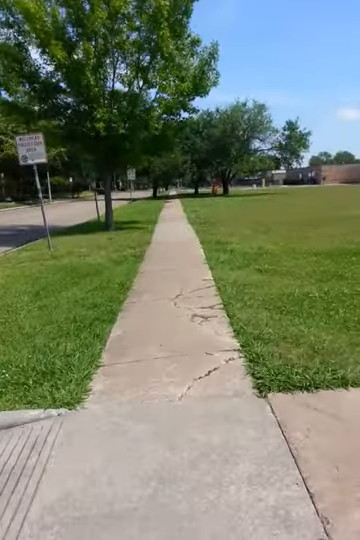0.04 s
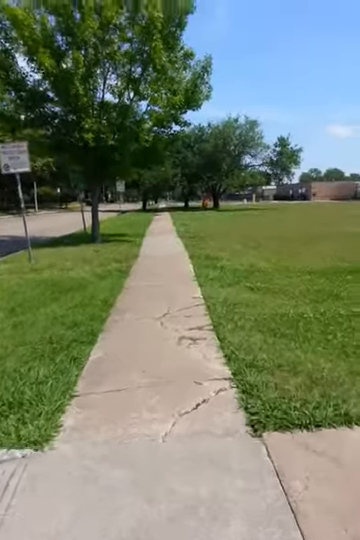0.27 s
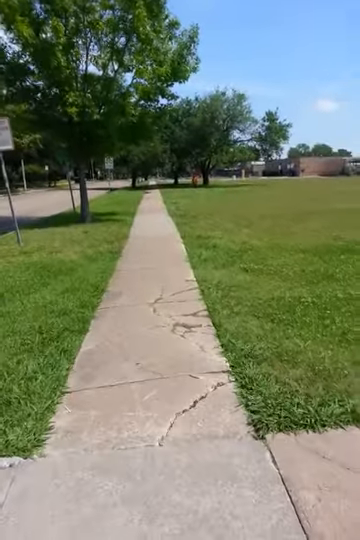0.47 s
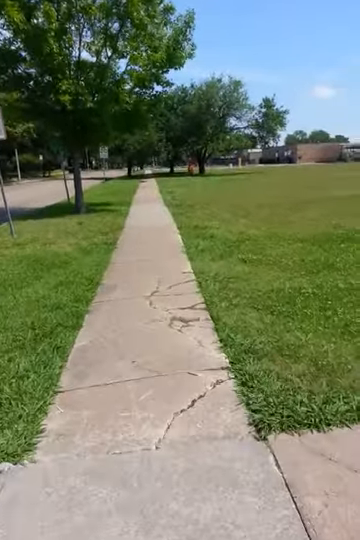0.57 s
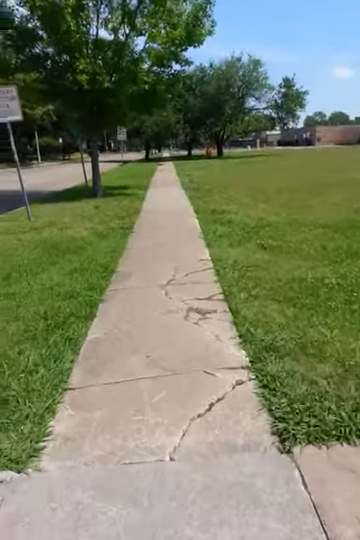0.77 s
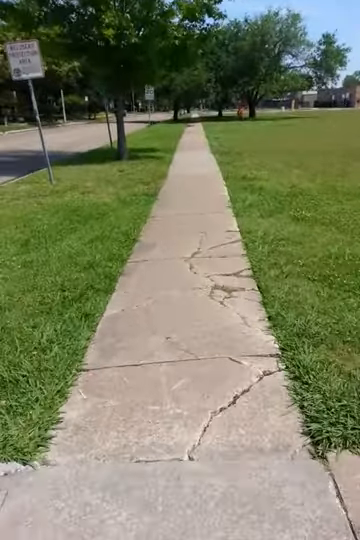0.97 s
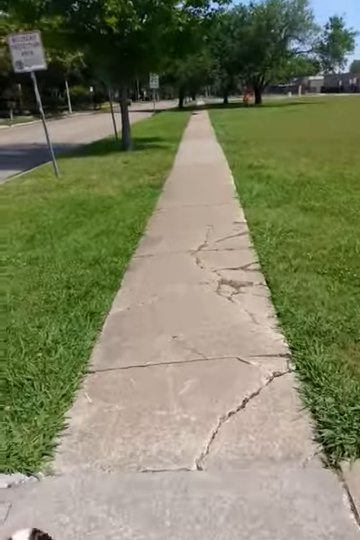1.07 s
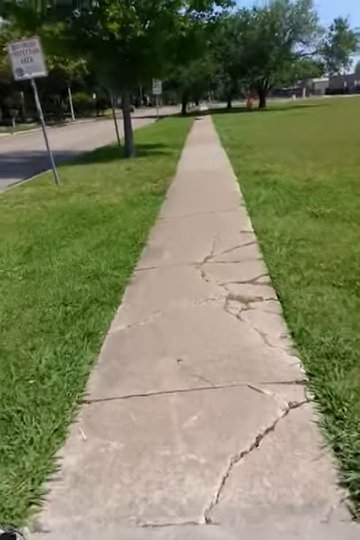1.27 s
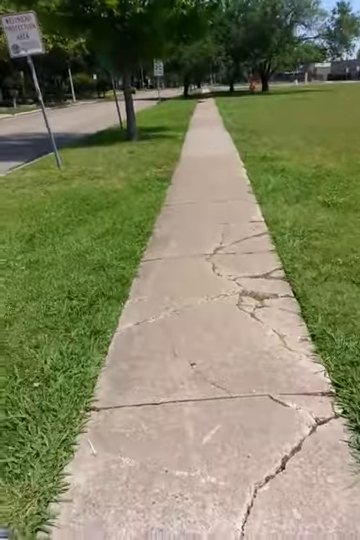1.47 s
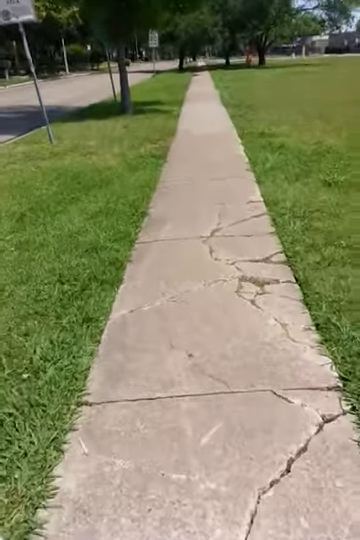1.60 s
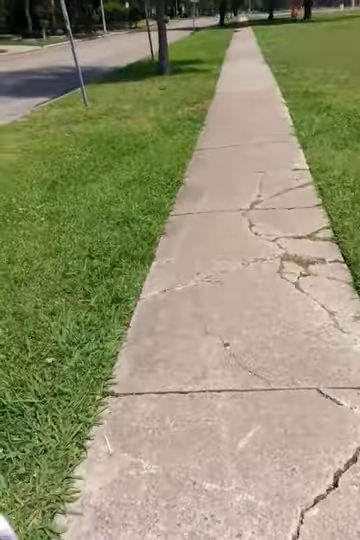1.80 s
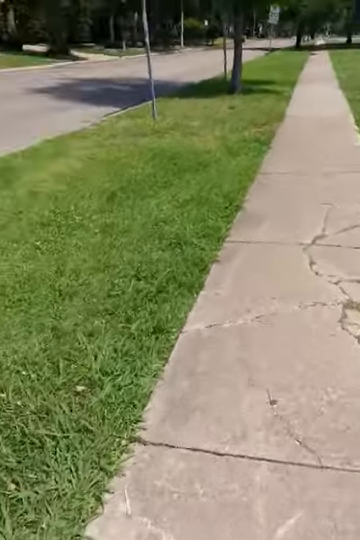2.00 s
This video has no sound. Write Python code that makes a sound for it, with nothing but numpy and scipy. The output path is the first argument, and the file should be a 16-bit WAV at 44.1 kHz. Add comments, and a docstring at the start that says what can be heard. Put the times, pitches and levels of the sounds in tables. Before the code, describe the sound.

Footsteps scuff and crunch on a gritty concrete sidewalk, with a heavy dull wind thump midway

```python
"""A concrete sidewalk, walked with a phone in hand. Soles and clothing rub (dense random slips under
rounded strokes), grit crunches (short bright clusters of cracks) and shoes knock softly (damped noise).
Air buffets the left microphone port twice, the second time as a heavy dull thump (fluttering noise).
A small bird sings a buzzy phrase in the trees (frequency-modulated glides with faint echoes);
light wind and far traffic lie underneath (coloured noise)."""
import sys
import numpy as np
from scipy import signal
from scipy.fft import rfft, irfft
from scipy.io import wavfile
from scipy.ndimage import uniform_filter1d

SR = 44100
rng = np.random.default_rng(int(sys.argv[2]) if len(sys.argv) > 2 else 0)


def transcribe(signal):
    """Save signal, clipped to [-1, 1], as a 16-bit WAV file at the path in sys.argv[1]."""
    frames = np.atleast_2d(signal).T
    limited = np.clip(frames, -1, 1)
    pcm = np.round(limited * 32767).astype(np.int16)
    wavfile.write(sys.argv[1], SR, pcm)


N = 90360
TIME_S = np.arange(N) / SR


def from_db(db):
    """Decibels to amplitude gain."""
    return 10 ** (np.asarray(db) / 20)


def unit_power(x):
    """Scale to an RMS of 1 over all channels together."""
    return x / np.sqrt(np.mean(x ** 2) + 1e-20)


def pan(left_minus_right_db):
    """Left and right gains, half the level difference each way."""
    return from_db(np.array([[left_minus_right_db], [-left_minus_right_db]]) / 2)


def bin_frequencies_hz():
    """FFT bin frequencies, floored at 1 Hz to allow a logarithm."""
    return np.maximum(np.fft.rfftfreq(N, 1 / SR), 1)


def colour(x, spectrum, tilt_db_per_octave=0):
    """Impose a spectrum, tilted about 4 kHz, with a bass roll-off at 20 Hz; unit power."""
    hz = bin_frequencies_hz()
    knots_hz, knots_db = np.transpose(spectrum)
    shape_db = np.interp(np.log(hz), np.log(knots_hz), knots_db)
    shape_db = shape_db + tilt_db_per_octave * np.log2(np.maximum(hz, 1000) / 4000)  # no tilt below 1 kHz
    bass_rolloff = hz / np.hypot(hz, 20)
    return unit_power(irfft(rfft(x) * from_db(shape_db) * bass_rolloff, N))


def coloured_noise(spectrum):
    """Turbulent or diffuse sound: noise of a given spectrum, unrelated at the two ports."""
    return colour(rng.standard_normal((2, N)), spectrum)


def lowpass(x, cutoff_hz):
    """Second-order Butterworth low-pass."""
    return signal.sosfilt(signal.butter(2, cutoff_hz, fs=SR, output="sos"), x)


def grains(per_s, spread_db):
    """Friction as sparse random impulses of uneven size and either sign."""
    excess_db = spread_db * np.minimum(rng.exponential(1, (2, N)), 4)
    present = rng.random((2, N)) < per_s / SR
    return present * from_db(excess_db) * rng.choice([-1, 1], (2, N))


def swell(peak_s, rise_s, fall_s):
    """A Gaussian rise and fall of separate widths."""
    width_s = np.where(TIME_S < peak_s, rise_s, fall_s)
    return np.exp(-((TIME_S - peak_s) / width_s) ** 2 / np.sqrt(2))


def scuffs():
    """Soles and cloth rub: dense slips under each stroke."""
    # strokes: peak t/s, rise/s, fall/s, level/dB, treble tilt/(dB/octave), left-right/dB
    strokes = [(.035, 0.045, 0.051, -49.5, -1.5, 2), (.17, 0.047, 0.13, -55.5, 0, 0),
               (0.359, 0.019, 0.039, -52, -1.5, 1), (.455, 0.018, 0.027, -58.5, 1.5, 1),
               (.5, 0.012, 0.023, -53, -2, 2), (0.584, 0.022, 0.025, -53, -1.5, 1),
               (.645, 0.025, 0.02, -54, 0, -0.5), (.715, 0.02, 0.012, -56.5, 2.5, 2.5),
               (.905, 0.019, 0.037, -51.5, -1.5, 2), (1.024, 0.065, 0.084, -46.5, 1.5, -2.5),
               (1.17, 0.082, 0.1, -54, 0, -0.5), (1.3, 0.022, 0.02, -52.5, -0.5, 0.5),
               (1.38, 0.026, 0.027, -53.5, 1, 0), (1.44, 0.042, 0.025, -61, -7.5, 10),
               (1.47, 0.037, 0.04, -53, -2, -2.5), (1.56, .06, 0.054, -54, 0.5, 0),
               (1.62, 0.013, 0.018, -54, -3.5, 3), (1.675, 0.054, 0.11, -54, -0.5, -1),
               (1.8, 0.021, 0.082, -68.5, 7, -6), (1.99, 0.044, 0.043, -54, 3, -1.5),
               (2.046, 0.016, .02, -53.5, -1, 0)]
    # rubbing spectrum: f/Hz, density level/dB
    cloth_spectrum = [(300, -12.5), (800, 4.5), (1300, -2.5), (2000, 1), (3000, -3), (4500, -2.5),
                      (6500, 2.5), (9000, -4.5), (12000, -7.5), (15000, -20.5)]
    slips = grains(per_s=8200, spread_db=4)
    out = 0
    for peak_s, rise_s, fall_s, level_db, tilt, side_db in strokes:
        stroke = swell(peak_s, rise_s, fall_s) * colour(slips, cloth_spectrum, tilt)
        out = out + from_db(level_db) * pan(side_db) * stroke
    return out


def crunches():
    """Grit cracks under a sole in short bright clusters."""
    # clusters: peak t/s, spread/s, level/dB, left-right/dB, treble tilt/(dB/octave)
    clusters = [(0.057, 0.0034, -43, -1, 0.5), (0.239, 0.0034, -40, 5, -1), (0.277, 0.0035, -42, -2, -2),
                (0.354, 0.0018, -48.5, 13, -8), (0.4925, 0.0022, -43, 1, 5.5), (.651, 0.0058, -52, 0, -4),
                (0.708, 0.0019, -45, 2, 9), (0.895, 0.0017, -49, 7, -10.5), (.913, 0.0017, -51, 12, -3),
                (.928, 0.0027, -43.5, -3, 5.5), (0.975, 0.0024, -47, 7, -10), (1.465, 0.0097, -49, 6, -6),
                (1.69, 0.0018, -46.5, 2, -1)]
    # cracking spectrum: f/Hz, density level/dB
    grit_spectrum = [(1000, -27), (3000, -20), (4200, -10.5), (5300, 1.5), (8000, 3.5), (10000, -6),
                     (12000, -7.5), (15000, -9.5)]
    cracks = grains(per_s=10000, spread_db=5)
    out = 0
    for peak_s, spread_s, level_db, side_db, tilt in clusters:
        cluster = swell(peak_s, spread_s, spread_s) * colour(cracks, grit_spectrum, tilt)
        out = out + from_db(level_db) * pan(side_db) * cluster
    return out


def knocks():
    """Soft, heavily damped shoe contacts: short swells of dull noise."""
    # contacts: peak t/s, level/dB
    contacts = [(0.981, -46), (1.171, -43), (2.007, -46)]
    # contact spectrum: f/Hz, density level/dB
    knock_spectrum = [(250, -4), (500, -3), (750, 7), (1100, -8), (2500, -26)]
    rise_s, fall_s = 0.006, 0.014
    envelope = sum(from_db(level_db) * swell(peak_s, rise_s, fall_s) for peak_s, level_db in contacts)
    return coloured_noise(knock_spectrum) * envelope


def buffets():
    """In each puff, eddies of fairly even strength flutter over the left port."""
    # puffs: start t/s, start to release/s, release/s, level/dB, eddy rate/Hz
    puffs = [(0.206, 0.014, 0.0083, -22.5, 211), (0.23, 0.026, 0.051, -33.5, 132),
             (0.315, .12, 0.0083, -34.5, 164), (1.474, 0.013, 0.0082, -15, 143.6),
             (1.494, 0.02, 0.0172, -14.5, 203.3), (1.535, .013, 0.0025, -10.5, 198),
             (1.555, 0.015, 0.022, -17, 239), (1.588, 0.078, 0.016, -16, 198),
             (1.675, 0.025, .012, -27.5, 270)]
    # eddy spectrum: f/eddy rate, density level/dB
    eddy_spectrum = [(.13, -39), (.27, -12), (.47, -7), (.72, -6.5), (.95, 2.5), (1.35, -14), (1.8, -10),
                     (2.3, -16.5), (3.1, -30), (4.2, -36.5), (6.3, -52), (13, -70)]
    attack_s, top_hz, right_leak_db = 0.0056, 795, -40
    evenness = 0.65  # 0 = natural fluctuation, 1 = constant strength
    out = 0
    for start_s, hold_s, release_s, level_db, eddy_hz in puffs:
        spectrum = [(multiple * eddy_hz, db) for multiple, db in eddy_spectrum]
        eddies = colour(rng.standard_normal(N), spectrum)
        strength = np.sqrt(uniform_filter1d(eddies ** 2, size=500) + 1e-6)
        even_eddies = unit_power(eddies / strength ** evenness)
        attack = np.clip((TIME_S - start_s) / attack_s, 0, 1)
        release = np.exp(-np.maximum(TIME_S - start_s - hold_s, 0) / release_s)
        out = out + from_db(level_db) * attack * release * even_eddies
    return lowpass(out, top_hz) * from_db([[0], [right_leak_db]])


def bird():
    """Gliding whistles, made buzzy by a fast warble, with faint echoes off the trees."""
    # start t/s, length/s, first f/Hz, middle f/Hz, last f/Hz, level/dB, buzz depth/Hz,
    # roughness (0-1), left-right/dB
    notes = [(0.049, 0.091, 6950, 6850, 6960, -60.5, 20, 0.17, -9),
             (0.116, 0.15, 7180, 7120, 6950, -60.5, 20, 0.27, -7),
             (1.165, 0.067, 5550, 5950, 5720, -51, 320, 0.54, 5),
             (1.256, 0.072, 4424, 5900, 6180, -51, 230, 0.39, 2.5),
             (1.36, 0.049, 4650, 5250, 5750, -52.5, 490, 0.31, 4.5),
             (1.439, .09, 4860, 4810, 4610, -58, 250, .4, 5),
             (1.597, .108, 4150, 4595, 4500, -56, 490, 0.34, 3),
             (1.739, 0.088, 4060, 4760, 4820, -54, 330, 0, -0.5)]
    # nominal echo delays/s
    echo_delays_s = [0.022, 0.0066, .031]
    buzz_rate_hz, fade_s, echo_db = 422.6, 0.017, -10
    jitter_hz = 482 * unit_power(lowpass(rng.standard_normal(N), 640))  # RMS at roughness 1
    song = np.zeros((2, N))
    for start_s, length_s, first_hz, middle_hz, last_hz, level_db, buzz_hz, roughness, side_db in notes:
        parabola = np.polyfit([0, .5, 1], [first_hz, middle_hz, last_hz], 2)
        glide_hz = np.polyval(parabola, np.clip((TIME_S - start_s) / length_s, 0, 1))
        warble_hz = buzz_hz * np.sin(2 * np.pi * buzz_rate_hz * TIME_S)
        pitch_hz = glide_hz + warble_hz + roughness * jitter_hz
        edge_s = np.minimum(TIME_S - start_s, start_s + length_s - TIME_S)
        gate = np.clip(edge_s / fade_s, 0, 1)
        whistle = np.sin(2 * np.pi * np.cumsum(pitch_hz) / SR)
        song += from_db(level_db) * pan(side_db) * gate * whistle
    echoes = np.zeros((2, N))
    for channel in range(2):
        for delay_s in echo_delays_s:
            arrival_s = delay_s * rng.uniform(.8, 1.4)
            echoes[channel] += np.interp(TIME_S - arrival_s, TIME_S, song[channel])
    return song + from_db(echo_db) * echoes


def wind():
    """Light wind rumbles at the ports: low noise of wandering level."""
    # wind level: t/s, left level/dB, right level/dB
    wind_level = [(0, -33, -42), (.15, -42, -48), (.27, -30.5, -39), (.45, -44, -46.5), (.8, -40, -41.5),
                  (1.05, -39.5, -48), (1.33, -42.5, -42), (1.43, -39, -34), (1.52, -32, -46.5),
                  (1.8, -43, -41), (2.05, -40, -42)]
    # wind spectrum: f/Hz, density level/dB
    wind_spectrum = [(20, -45), (35, -22.5), (60, -6.5), (110, -0.5), (170, -3.5), (280, -9.5), (400, -20),
                     (700, -27.5), (1500, -55)]
    knots_s, *sides_db = np.transpose(wind_level)
    gains = from_db([np.interp(TIME_S, knots_s, side_db) for side_db in sides_db])
    return gains * coloured_noise(wind_spectrum)


def traffic():
    """Far traffic merges into steady noise."""
    # traffic spectrum: f/Hz, density level/dB
    traffic_spectrum = [(100, -0.5), (300, 4), (480, -3.5), (750, 1), (1100, -7.5), (1600, -16.5),
                        (2500, -20), (4000, -23), (7000, -20.5), (10000, -28), (15000, -30)]
    return from_db(-49) * coloured_noise(traffic_spectrum)


def scene():
    """Everything that reaches the phone."""
    return scuffs() + crunches() + knocks() + buffets() + bird() + wind() + traffic()


def record(dry):
    """Each port has its own frequency response; the deepest bass and the top are cut."""
    # port response: f/Hz, left level/dB, right level/dB
    port_response = [(40, -1.5, 13.5), (116, 2.5, 6), (250, 2.5, 0), (425, -0.5, -2.5), (730, -2, -3),
                     (1500, 3.5, -0.5), (3100, 3, 0.5), (4580, 4.5, 1), (5880, 8.5, -3.5), (6930, 1, 4),
                     (7420, 1, 7), (8700, 0.5, 2.5), (11000, 1.5, 0.5), (15000, 0, 3)]
    low_cut_hz, top_cut_hz = 39, 14600
    knots_hz, *sides_db = np.transpose(port_response)
    log_hz = np.log(bin_frequencies_hz())
    gains = from_db([np.interp(log_hz, np.log(knots_hz), side_db) for side_db in sides_db])
    heard = irfft(rfft(dry) * gains, N)
    heard = signal.sosfilt(signal.butter(3, low_cut_hz, "high", fs=SR, output="sos"), heard)
    return signal.sosfilt(signal.ellip(12, .1, 80, top_cut_hz, fs=SR, output="sos"), heard)


dry = scene()
out = record(dry)
transcribe(out)
```